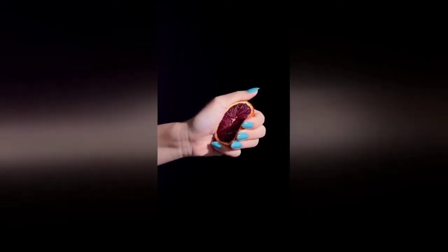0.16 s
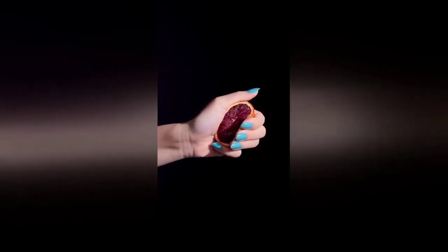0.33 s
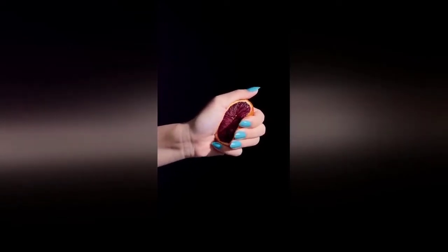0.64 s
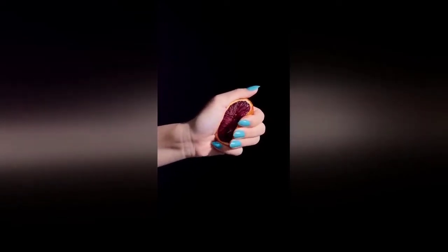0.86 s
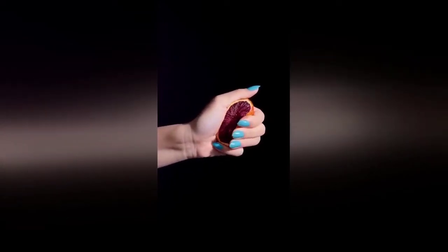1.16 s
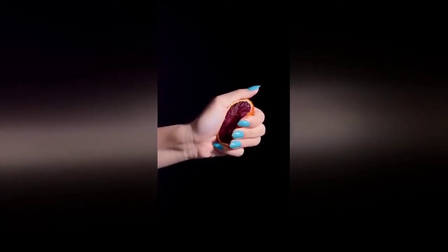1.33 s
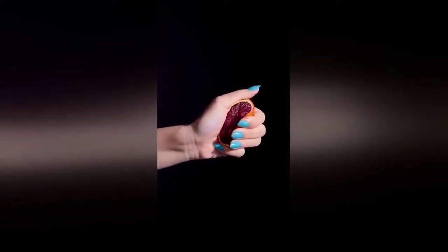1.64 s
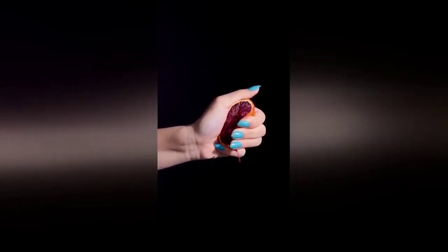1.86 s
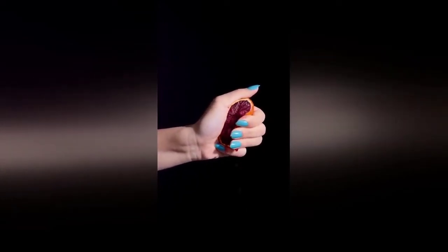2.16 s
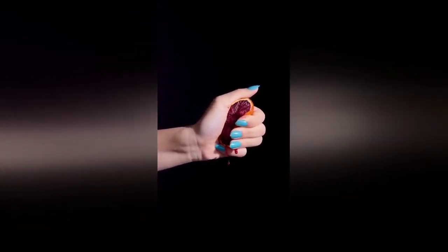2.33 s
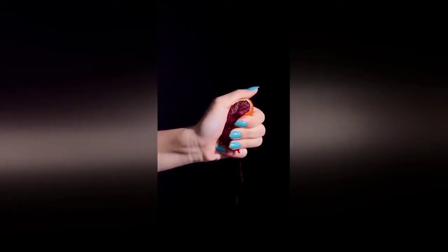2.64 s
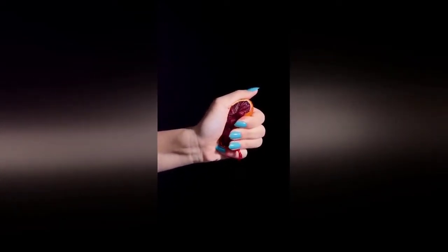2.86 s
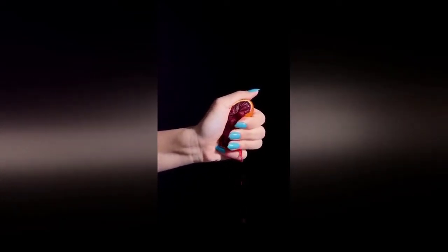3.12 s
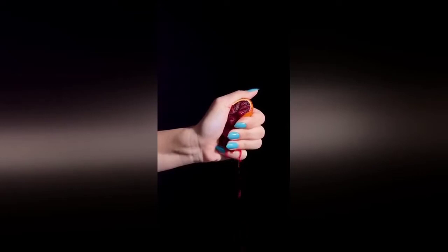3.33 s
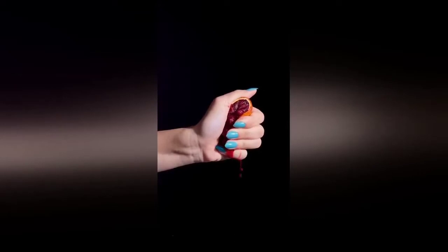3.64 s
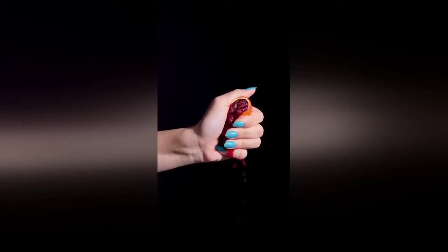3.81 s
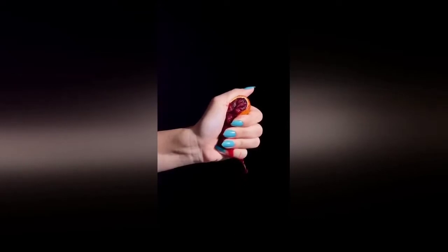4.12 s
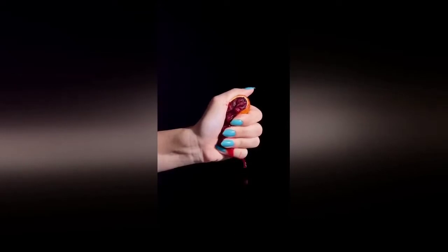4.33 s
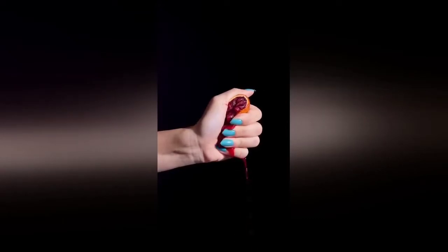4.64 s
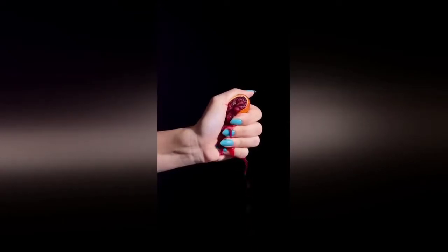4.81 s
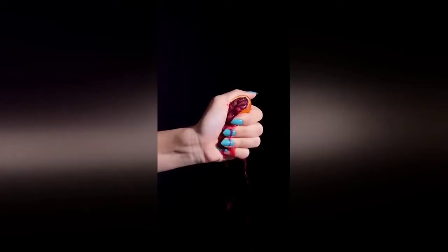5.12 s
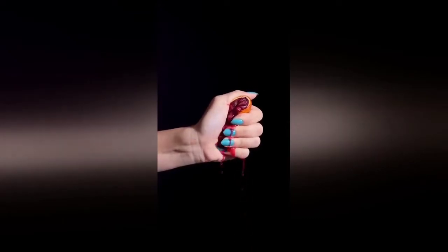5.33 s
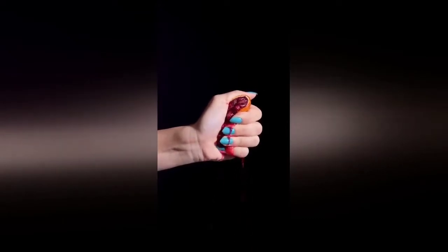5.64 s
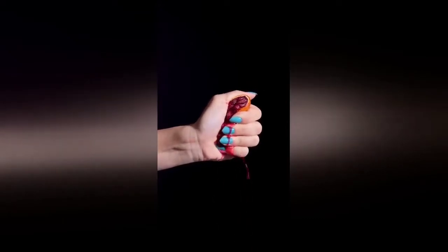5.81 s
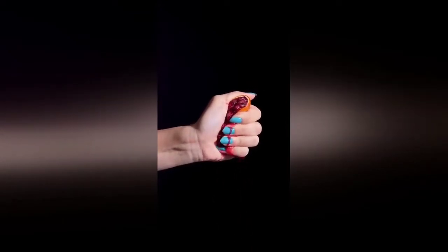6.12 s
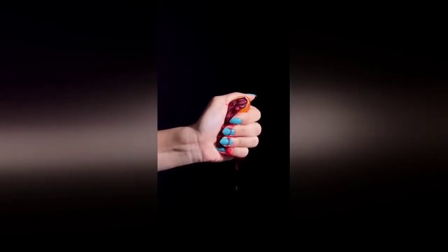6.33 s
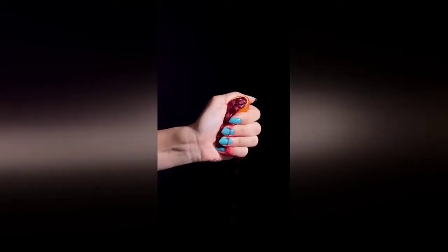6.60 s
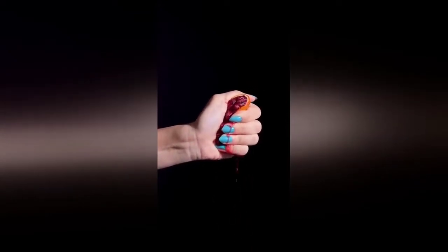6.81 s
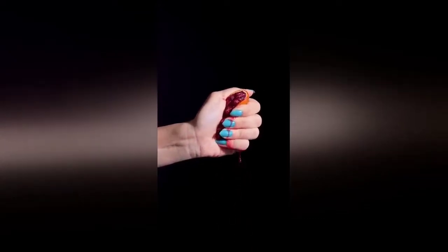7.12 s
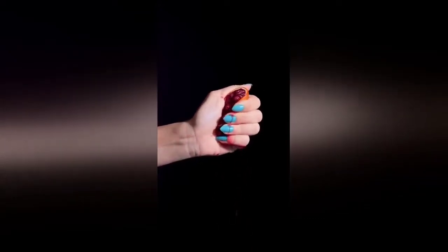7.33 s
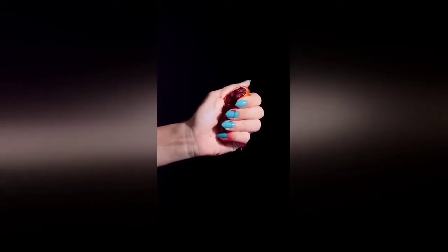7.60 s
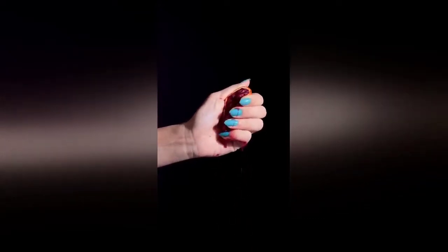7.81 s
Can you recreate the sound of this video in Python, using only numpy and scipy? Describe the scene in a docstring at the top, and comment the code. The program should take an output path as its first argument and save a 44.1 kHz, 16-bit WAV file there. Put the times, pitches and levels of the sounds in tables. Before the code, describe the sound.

A hand slowly crushes a juicy citrus half, with wet popping, crackling and squelching that fades into a faint trickle.

```python
"""In a quiet room, a hand slowly crushes half a juicy citrus fruit, very close. Juice cells pop, pulp fizzes
and squelches in the hollow of the fist, dull low thumps sound and juice squirts out; then it only trickles and
ticks while the whole sound fades to silence. Everything arrives twice, under 2 ms apart, which combs the
spectrum."""
import sys
import numpy as np
from scipy import signal
from scipy.fft import rfft, irfft, next_fast_len
from scipy.io import wavfile
from scipy.ndimage import uniform_filter1d

SR = 44100
rng = np.random.default_rng(int(sys.argv[2]) if len(sys.argv) > 2 else 0)


def master(y):
    """Save y as 16-bit WAV."""
    cut = np.clip(np.atleast_2d(y).T, -1, 1)
    pcm = np.round(cut * 32767)  # scale
    wavfile.write(sys.argv[1], SR, pcm.astype(np.int16))


N = 351036
TRICKLE_FROM_S, DRAINED_FROM_S, SILENT_FROM_S = 3.0, 3.7, 7.42

# Pulp under pressure, before the fade. Each row: time in seconds, then slurp, crackle and fizz in dB.
PULP_LEVELS = [(0.0, -33, -30.5, -52.5), (0.3, -35.5, -38, -39), (0.59, -27.5, -16.5, -31.5),
               (0.87, -29, -24.5, -50.5), (1.04, -32, -27.5, -54.5), (1.19, -39.5, -45.5, -34),
               (1.27, -37, -37.5, -19), (1.46, -41, -30.5, -41.5), (1.7, -44, -33.5, -33),
               (1.88, -54.5, -45, -38), (2.05, -44, -39, -33), (2.22, -45.5, -43.5, -39.5),
               (2.5, -36, -59.5, -43.5), (2.66, -26, -36, -30), (2.84, -34, -50, -32.5),
               (2.93, -36, -39.5, -25), (3.15, -51, -50, -43.5), (3.52, -45.5, -44.5, -37),
               (3.7, -49, -46, -43), (4.1, -56.5, -50.5, -44), (4.6, -60.5, -49.5, -45),
               (5.43, -56, -53, -46.5), (7.3, -65, -56, -52.5)]


def from_db(db):
    """Decibels to gain."""
    return 10 ** (np.asarray(db) / 20)


def rms_one(x):
    """Scale to unit rms."""
    return x / np.sqrt(np.mean(x ** 2) + 1e-20)


def peak_one(x):
    """Scale to unit peak."""
    return x / np.max(np.abs(x))


def in_time(rows):
    """Turn breakpoints into automation curves, one per column after the time."""
    times, *columns = np.transpose(rows)
    return [np.interp(np.arange(N) / SR, times, column) for column in columns]


def at_hz(points, hz):
    """Read an EQ curve on a log-frequency axis."""
    freqs, levels_db = np.transpose(points)
    return np.interp(np.log(hz), np.log(freqs), levels_db)


def drift(rate_hz):
    """A smooth random wobble of about unit spread."""
    r = np.exp(-40 * np.pi * rate_hz / SR)
    slow = signal.lfilter([1], [1, -2 * r, r * r], rng.standard_normal(N // 20 + 2002))[2000:]
    return np.interp(np.arange(N) / 20, np.arange(len(slow)), rms_one(slow))


def resonance(x, hz, width_hz):
    """Two-pole band-pass with unit gain at its peak."""
    r = np.exp(-np.pi * width_hz / SR)
    poles = [1, -2 * r * np.cos(2 * np.pi * hz / SR), r * r]
    return signal.lfilter([(1 - r * r) / 2, 0, (r * r - 1) / 2], poles, x)


def steep_resonance(x, hz, width_hz):
    """Two equal band-passes in series."""
    return resonance(resonance(x, hz, width_hz), hz, width_hz)


def add(out, start_s, sound):
    """Mix a short sound in at its start time."""
    i = round(start_s * SR)
    sound = sound[max(-i, 0):N - i]
    out[max(i, 0):max(i, 0) + len(sound)] += sound


def fade_db(from_s=2.03, to_s=7.54):
    """A nearly straight gain ramp: unity before from_s, down to silence at to_s."""
    left = (to_s - np.arange(N) / SR) / (to_s - from_s)
    return 20 * 1.007 * np.log10(np.clip(left, 1e-4, 1))


def grains(spectrum, per_s, spread_db, q, clump_db, hiss_db):
    """Tiny random bursts, swelling in clumps, each ringing briefly at one of nine pitches over wet hiss."""
    sizes = from_db(spread_db * np.minimum(rng.exponential(1, N), 3)) * rng.choice([-1, 1], N)
    clicks = rms_one(sizes * (rng.random(N) < per_s / SR))
    band = rng.integers(0, 9, N)
    hiss = from_db(hiss_db) * rng.standard_normal((2, N))
    out = 0
    for k, hz in enumerate(np.geomspace(spectrum[0][0], spectrum[-1][0], num=9)):
        ringing = resonance(clicks * (band == k) + hiss[k % 2], hz, hz / q)
        out = out + from_db(at_hz(spectrum, hz) + clump_db * drift(44)) * rms_one(ringing)
    return rms_one(out * from_db(clump_db * 0.92 * drift(35)))


def room():
    """Dull rumble and air of a quiet room, gently wavering."""
    # The room's tone colour. Each row: frequency in Hz, relative level in dB.
    room_eq = [(20, -25.5), (45, -12), (80, -5), (130, 2), (200, -9.5), (300, -11), (600, -10.5),
               (1200, -17.5), (2500, -27.5), (6000, -24.5), (16000, -23)]
    size = next_fast_len(N)
    hz = np.maximum(np.fft.rfftfreq(size, 1 / SR), 1)
    tone = irfft(rfft(rng.standard_normal(size)) * from_db(at_hz(room_eq, hz)), size)[:N]
    return from_db(-50 + 1.3 * drift(3.1)) * rms_one(tone)


def pulp():
    """Slurp of juice in the gaps, crackle of collapsing cells, and the finer fizz forced through them."""
    # The tone colours of the three textures. Each row: frequency in Hz, relative level in dB.
    slurp_eq = [(1200, -18), (1700, 4.5), (2300, 12), (3000, -5.5), (3600, -11.5)]
    crackle_eq = [(2600, -15.5), (3300, 0), (4500, -1), (6000, 0.5), (7500, -9)]
    fizz_eq = [(5000, -11), (6500, -8), (8500, -2.5), (11000, -4.5), (13000, -2), (16000, -1.5)]
    slurp_db, crackle_db, fizz_db = in_time(PULP_LEVELS)
    dense_from_db, dense_span_db = -36.5, 9.5
    density = np.clip((np.maximum(crackle_db, slurp_db) - dense_from_db) / dense_span_db, 0, 1)
    uneven = 1 - 0.28 * density  # hard-pressed pulp crackles densely, so more evenly
    slurp = grains(slurp_eq, per_s=1600, spread_db=6, q=6.2, clump_db=4 * uneven, hiss_db=-10)
    crackle = grains(crackle_eq, per_s=2800, spread_db=5.5, q=6, clump_db=4.4 * uneven, hiss_db=-11.5)
    fizz = grains(fizz_eq, per_s=1300, spread_db=0.5, q=9.6, clump_db=3.7 * uneven, hiss_db=-9.5)
    return from_db(slurp_db) * slurp + from_db(crackle_db) * crackle + from_db(fizz_db) * fizz


def squelch():
    """Gurgles excite the air pocket in the fist: the grip moves its pitch; a closed fist rings sharper."""
    # The wet hollow, before the fade. Each row: time in seconds, level in dB, pitch in Hz.
    hollow = [(0.0, -39.5, 1106), (0.39, -46.5, 1050), (0.6, -36, 1000), (0.79, -43, 1050),
              (1.03, -41, 1070), (1.4, -46.5, 1068), (1.72, -38, 1228), (1.85, -46.5, 1197),
              (2.05, -46.5, 1128), (2.36, -46.5, 1114), (2.594, -30, 961), (2.904, -39, 862),
              (3.05, -47, 903), (3.38, -48, 880), (3.46, -41, 843.5), (3.578, -36.5, 803),
              (3.67, -50.5, 836), (4.2, -56, 849), (4.5, -80, 616)]
    # Single gulps, before the fade. Each row: peak time in seconds, level in dB, fall in seconds.
    gulps = [(1.46, -27, 0.029), (1.768, -24, 0.037), (2.124, -17.5, 0.056), (2.242, -25.5, 0.09),
             (2.345, -24, 0.019), (3.192, -27.5, 0.036), (3.296, -34.5, 0.044), (3.646, -33, .02),
             (6.54, -45.5, 0.14)]
    # The fist around the pocket. Each row: time in seconds, closure from 0 (open) to 1 (shut).
    grip = [(0, 0.26), (2.0, 0.07), (2.1, 0.87), (2.95, 0.99), (3.05, 0.03), (6.4, 0.9)]
    fall_db, rise_share = 25, 0.438  # a gulp rises quicker than it falls
    level_db, hz = in_time(hollow)
    for peak_s, peak_db, fall_s in gulps:
        late = (np.arange(N) / SR - peak_s) / fall_s
        level_db = np.maximum(level_db, peak_db - fall_db * np.maximum(late, -late / rise_share))
    closure = np.clip(in_time(grip)[0], 0, 1)
    gurgle = rng.standard_normal((2, 2, N)) * from_db(drift(60))
    phase = 2 * np.pi * np.cumsum(hz) / SR
    pocket = 0
    for noise, width_hz, share in zip(gurgle, (170, 700), (closure, 1 - closure)):
        r = np.exp(-np.pi * width_hz / SR)
        slow = signal.lfilter([1], [1, -2 * r, r * r], noise)
        pocket = pocket + np.sqrt(share) * rms_one(slow[0] * np.cos(phase) + slow[1] * np.sin(phase))
    return from_db(level_db) * pocket


def pops():
    """A cell's skin tears in an instant: a ring, a crack and a thud, in a longer cloud of spray."""
    # The clearest juice cells and air pockets bursting. Each row: time in seconds, relative level in dB,
    # ring pitch in Hz, then thud and spray trims in dB.
    clear_pops = [(0.0146, -9.5, 10100, -17, -15), (0.147, -19, 3820, -33, -9),
                  (0.2198, -17, 1880, -37, -29), (0.2707, -16.5, 3680, -38, -8.5),
                  (0.3028, -12.5, 3670, -38, -19), (0.3245, -4, 3630, -45, -10),
                  (0.3546, -8.5, 3160, -42, -7), (0.3965, 2.5, 5060, -28, -17),
                  (0.4295, 4.5, 7200, -26.5, -16), (0.4693, 4.5, 3710, -39, -7),
                  (0.5065, 9.5, 9350, -19, -17), (0.5557, 4, 3330, -42, -29), (0.5771, -12, 3530, -40, -26),
                  (0.6099, 9, 4490, -45, -15.5), (0.6526, -3, 3260, -46, -0.5),
                  (0.663, -0.5, 5030, -40, -14), (0.6813, -8, 3470, -29, -11),
                  (0.842, -9.5, 2640, -33, -30), (0.8734, -11.5, 3070, -47, -3),
                  (0.9744, -10.5, 4925, -11.5, -12), (1.0096, -7.5, 6600, -13, -9),
                  (1.034, 2.5, 5900, -19.5, -11), (1.1179, 0, 4780, -48, -8.5),
                  (1.135, -16, 10500, -40, -12.5), (1.1627, 8, 9760, -29.5, -13.5),
                  (1.2306, 4.5, 5600, -14.5, -6.5), (1.25, -7, 7340, -43, -7), (1.3001, 4.5, 5700, -45, -9),
                  (1.3974, -3, 8300, -43, -19), (1.4153, -1.5, 6550, -35, -14),
                  (1.431, -6.5, 6800, -40, -27), (1.512, 5.5, 3570, -24.5, -16.5),
                  (1.5632, 9.5, 6030, -22.5, -14), (1.577, 0, 6800, -35, -14),
                  (1.6184, -4, 3800, -24, -9.5), (1.665, -2.5, 9040, -26, -11), (1.672, -8, 5300, -40, -27),
                  (1.6977, 0.5, 6070, -45, -12), (1.733, -9, 6460, -46, -9), (1.8195, 2.5, 6070, -51, -5.5),
                  (1.908, 1, 5740, -36, -42), (1.9296, 2, 4120, -23, -10.5), (1.9954, 3, 5050, -55, -10),
                  (2.0404, 7.5, 5850, -41, -43), (2.0905, -1, 7500, -27, -12.5),
                  (2.2667, -17.5, 3594, -5, -5.5), (2.3323, -12.5, 4860, -38, -10),
                  (2.3443, -10.5, 2260, -41, -19), (2.365, -11.5, 4940, -37, -10.5),
                  (2.393, -13.5, 7900, -44, -32), (2.415, 0.5, 5840, -53, -15.5),
                  (2.5601, -14.5, 2070, -24, -32), (2.5805, -14, 2020, -5, -16),
                  (2.6287, -12.5, 2100, -9, -21), (2.6535, -8.5, 2750, -33, -31),
                  (2.8393, -17, 7700, -5, -21), (2.8625, -17.5, 2576, -11, -16),
                  (2.884, -5.5, 8180, -41, -8), (2.9505, -7, 8090, -44, -6), (3.0257, -21, 10200, -38, -1),
                  (3.1042, -23.5, 4753, 0.5, -19), (3.1908, 9, 6670, -29, -20),
                  (3.2914, -27.5, 2266, 2.5, -21), (3.3699, -33, 7200, -24, -14),
                  (3.4444, -22, 5240, -18, -8), (3.494, -17.5, 6524, -20, -16),
                  (3.5411, -33.5, 2225, -4, 6), (3.565, -19.5, 4900, -10, -6),
                  (3.6015, -15, 6100, -28, -19), (3.6421, -12.5, 7800, -36, -21),
                  (3.6595, -24, 5500, -26, -17), (3.6885, -30.5, 2260, -25, -4),
                  (3.905, -27.5, 8240, -26, -24), (3.9589, -8, 7580, -44, -41), (3.97, -17, 5470, -40, -11),
                  (4.0627, -20, 3290, -18, -11), (4.1845, -30, 2200, -30, -15),
                  (4.1954, -21.5, 3290, -33, -14), (4.37, -29.5, 6030, -4.5, -12),
                  (4.395, -26, 2200, -32, -15), (4.4284, -27, 5400, -32, -10),
                  (4.4538, -23, 5540, -33, -11), (4.6279, -24, 8800, -39, -22),
                  (4.66, -20.5, 10000, -35, -9.5), (4.9192, -23, 5870, -31, -13.5),
                  (5.0467, -23.5, 6750, -33, -27), (5.2947, -23, 4300, -44, -9.5),
                  (5.4438, -26, 8800, -41, -12), (5.5341, -28, 7400, -22.5, -22),
                  (5.7506, -28, 5490, -41, -13), (5.766, -34.5, 3560, -26, -6.5),
                  (5.8309, -29, 5900, -24.5, -25), (5.8669, -29, 4950, -27.5, -23.5),
                  (5.9916, -29.5, 10660, -28, -23), (6.1522, -44, 2256, -28, -15.5),
                  (6.2121, -43, 3330, -25.5, -18), (6.249, -39.5, 5990, -23, -16),
                  (6.368, -47, 3980, -28, -17.5), (6.428, -40, 7000, -25, -12),
                  (6.5169, -41.5, 3180, -23, -17), (6.61, -42.5, 4500, -31, -15),
                  (6.6586, -34.5, 8800, -31, -20.5), (6.7144, -35, 8730, -26.5, -23.5),
                  (6.853, -39.5, 7500, -27, -12), (7.1774, -46.5, 5530, -29, -18.5)]
    cells = clear_pops + trickle_pops()
    out, t = np.zeros(N), np.arange(2600) / SR - 0.015
    noise = rng.standard_normal((len(cells), 4, len(t)))
    cloud = np.exp(np.minimum(t / 0.0032, -t / 0.011))
    for (time_s, level_db, hz, thud_db, spray_db), (a, b, c, d) in zip(cells, noise):
        tear_s = 0.00082 * from_db(0.096 * level_db)  # louder pops tear for longer
        tear = np.exp(-(t / np.where(t < 0, 0.0005, tear_s)) ** 2)
        ring = peak_one(steep_resonance(a * tear, hz, hz / 5.6))
        ring *= from_db(-4 * (time_s > DRAINED_FROM_S))  # cells in drained pulp ring less
        crack = from_db(-5.5) * peak_one(resonance(b * tear, hz, 1.2 * hz))
        # The wet flesh around the cell bulges and slaps.
        thud = from_db(thud_db + 4.5) * peak_one(resonance(d * tear, 480, 800))
        slap = from_db(-19) * peak_one(steep_resonance(b * tear, 2200, 3700))
        # Once the juice only trickles, each pop rings the pocket in the fist.
        plink = (time_s > TRICKLE_FROM_S) * from_db(-22.5) * peak_one(resonance(a * tear, 788, 71))
        sizzle = peak_one(steep_resonance(c * (tear + 0.15 * cloud), 8700, 7200))
        mist_band = signal.butter(3, [0.76 * hz, min(1.82 * hz, 16000)], "band", fs=SR, output="sos")
        mist = cloud * rms_one(signal.sosfilt(mist_band, d))
        spray = from_db(spray_db) * (from_db(6) * sizzle + from_db(-4) * mist)
        add(out, time_s - 0.0155, from_db(level_db - 4.5) * (ring + crack + thud + slap + plink + spray))
    return out


def low_thumps():
    """A soft, dull low thump, a few low cycles long."""
    # The thumps. Each row: time in seconds, relative level in dB, pitch in Hz.
    thumps = [(0.503, -36, 296), (1.021, -37, 136), (1.227, -29.5, 196), (1.561, -36.5, 291),
              (1.763, -39, 114), (2.114, -24.5, 118), (2.569, -42, 125.9), (2.958, -35, 97.4),
              (3.187, -33, 139), (3.525, -37, 130)]
    out, t = np.zeros(N), np.arange(4000) / SR
    push = peak_one(t * np.exp(-t / 0.0045))
    for time_s, level_db, hz in thumps:
        add(out, time_s - 0.003, from_db(level_db - 4) * push * np.sin(2 * np.pi * hz * t))
    return out


def squirts():
    """Juice hisses and sputters through a narrow split, rising a little in pitch."""
    # Thin jets of juice. Each row: start in seconds, level in dB, starting pitch in Hz, length in seconds.
    jets = [(2.864, -26, 14160, 0.013), (2.872, -21.5, 10500, .005), (2.879, -18.5, 8030, 0.034),
            (2.917, -13.5, 7080, 0.022), (2.939, -25.5, 7270, 0.026), (2.958, -20, 14800, 0.014),
            (2.974, -25, 7900, 0.0082), (3.021, -23, 11040, 0.017)]
    out, sputter = np.zeros(N), from_db(drift(196))
    noise = rng.standard_normal((len(jets), 2500))
    for (start_s, level_db, hz, length_s), white in zip(jets, noise):
        n = round(length_s * SR)
        low, high = (rms_one(steep_resonance(white, f, 1100))[-n:] for f in (hz, 1.054 * hz))
        crossfade = np.linspace(0, np.pi / 2, n)
        hiss = low * np.cos(crossfade) + high * np.sin(crossfade)
        swell = np.sin(2 * crossfade) ** 0.47
        add(out, start_s, from_db(level_db) * swell * hiss)
    return out * sputter


def trickle_pops(count=60, low_hz=2880, high_hz=10760, thud_db=-23, spray_db=-20.5):
    """Rows for pops(): in the trickle, lesser cells burst at random, following the crackle's level."""
    when, pitch, size = rng.random((count, 3)).T
    onsets = ((TRICKLE_FROM_S + when * (SILENT_FROM_S - TRICKLE_FROM_S)) * SR).astype(int)
    crackle_db = in_time(PULP_LEVELS)[1] + fade_db()
    levels_db = crackle_db[onsets] + 19 - 5 * np.log(size + 0.036)  # a few stand well out
    pitches_hz = low_hz * (high_hz / low_hz) ** pitch
    return [(s, db, hz, thud_db, spray_db) for s, db, hz in zip(onsets / SR, levels_db, pitches_hz)]


def double_arrival(x, lag_samples=81):
    """A weaker arrival, thin in the bass, then the full one: together they comb the spectrum."""
    thin = x - 0.88 * uniform_filter1d(x, size=25)
    full = np.concatenate([np.zeros(lag_samples), x[:-lag_samples]])
    return from_db(-3.5) * (from_db(-6.5) * thin + full)


def scene():
    """A fading bed under pops, low thumps and squirts, all in the centre with a trace of width."""
    bed = from_db(fade_db()) * (pulp() + squelch() + room())
    mid = double_arrival(pops() + low_thumps() + squirts() + bed)
    smear = rng.standard_normal(400) * np.exp(-np.arange(400) / 69)
    side = from_db(-34.5) * signal.fftconvolve(mid, smear / np.linalg.norm(smear))[:N]
    return np.array([mid + side, mid - side])


def record(dry):
    """Soft clipping rounds the peaks, the tail is gated to near silence, a steep low-pass cuts the top."""
    gate = np.arange(N) < SILENT_FROM_S * SR
    hush = from_db(-104) * resonance(rng.standard_normal(N), 6500, 4000)
    rounded = 1.02 * np.tanh(dry / 0.68)
    low_pass = signal.ellip(14, 0.5, 90, 15620, fs=SR, output="sos")
    return signal.sosfilt(low_pass, rounded * gate + hush)


dry = scene()
out = record(dry)
master(out)
```